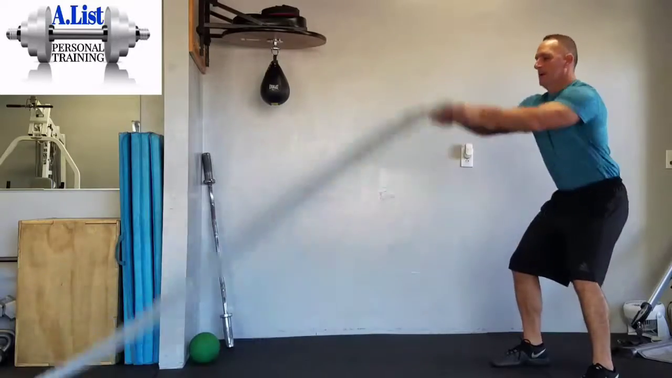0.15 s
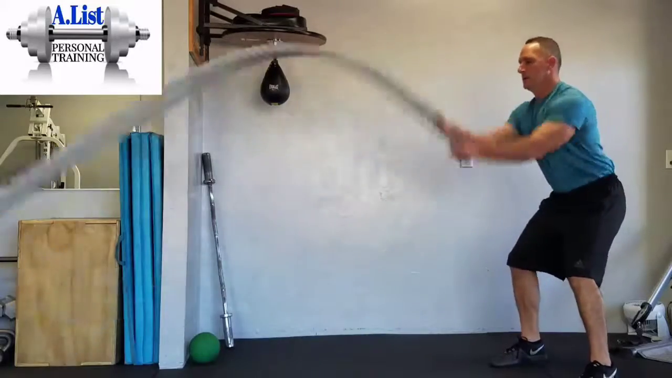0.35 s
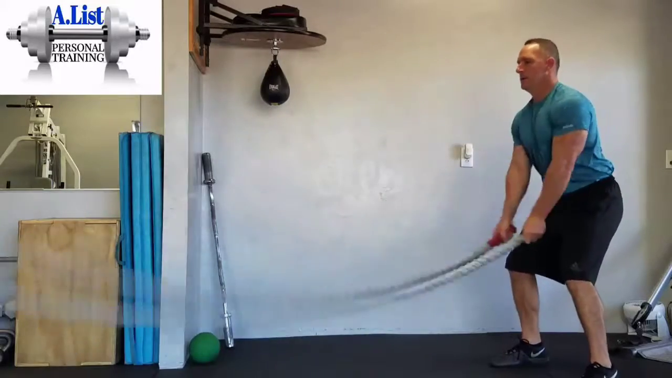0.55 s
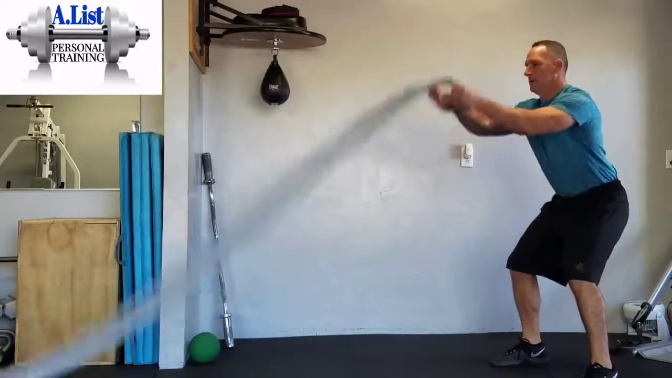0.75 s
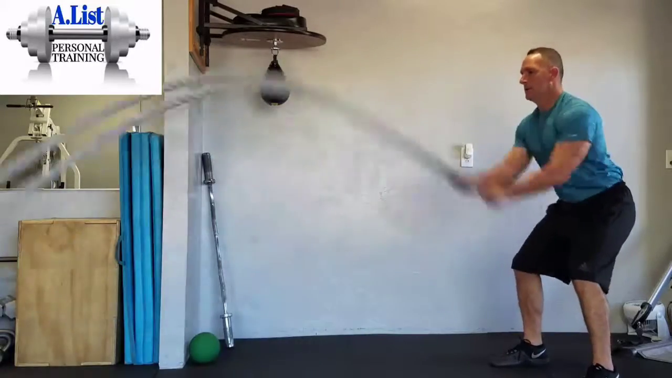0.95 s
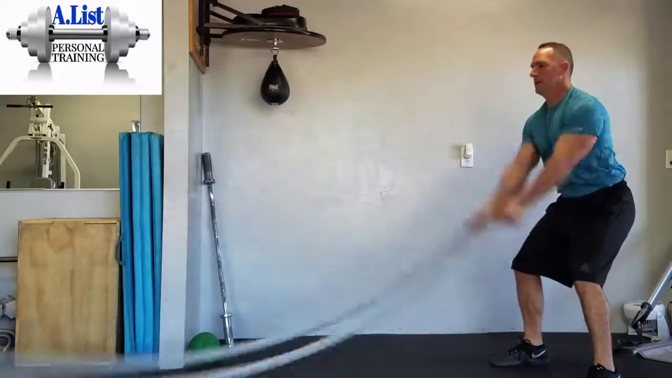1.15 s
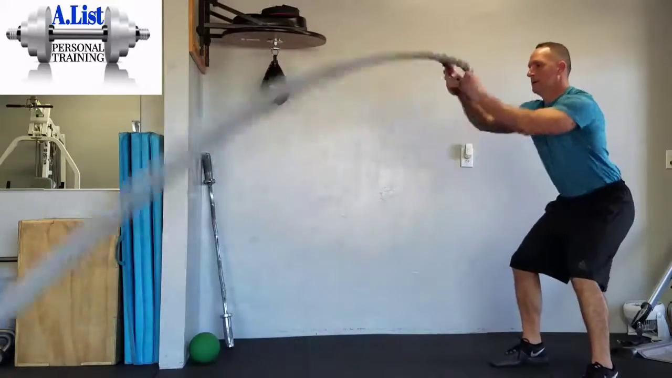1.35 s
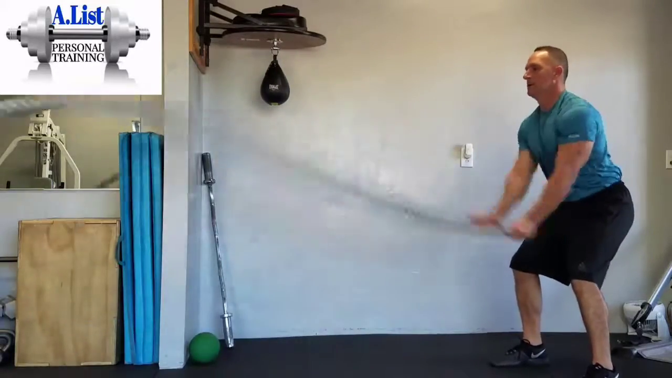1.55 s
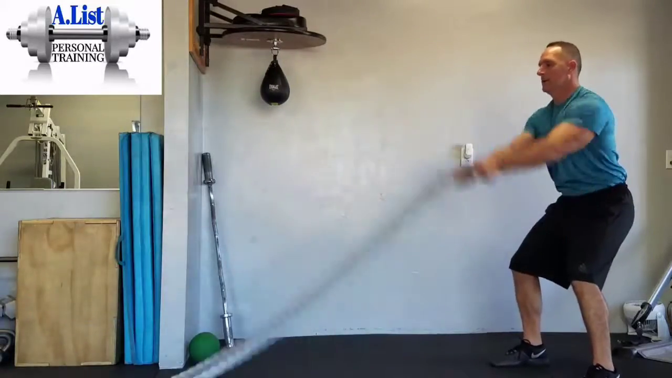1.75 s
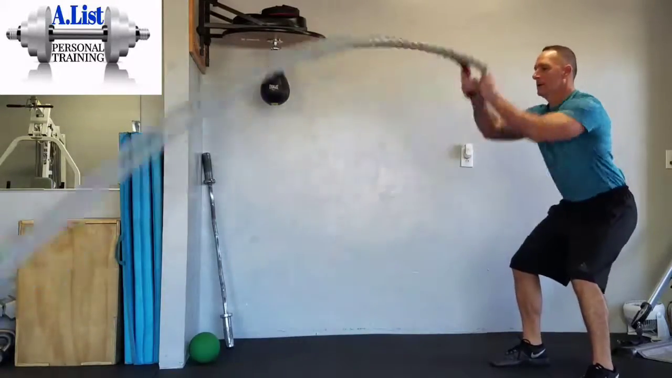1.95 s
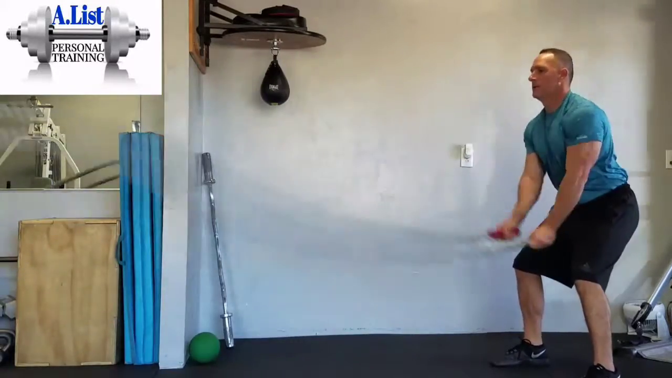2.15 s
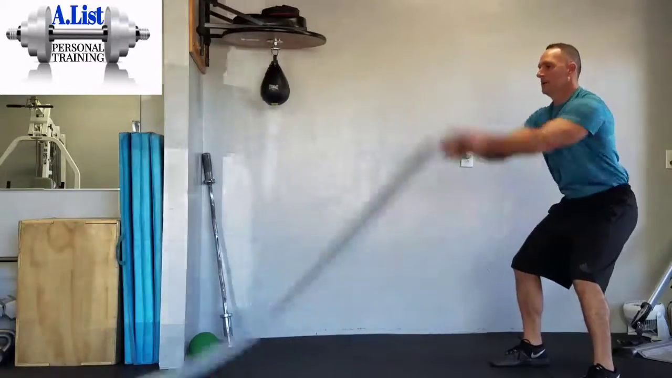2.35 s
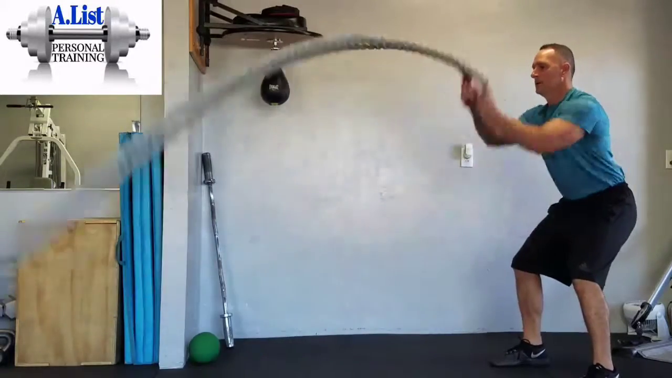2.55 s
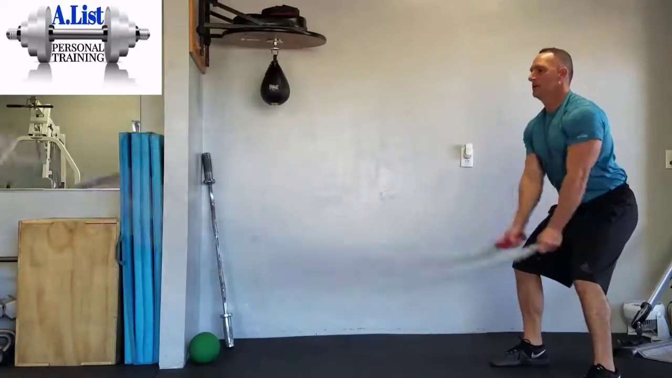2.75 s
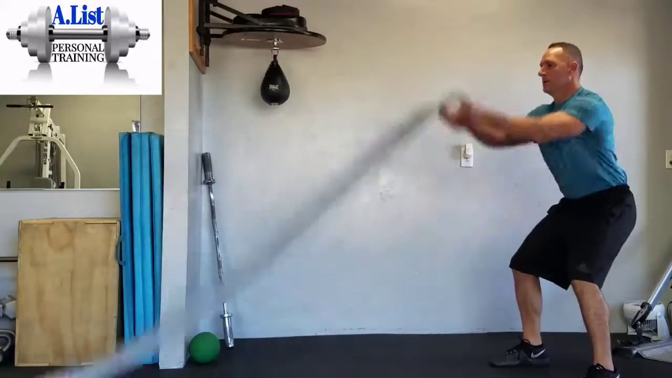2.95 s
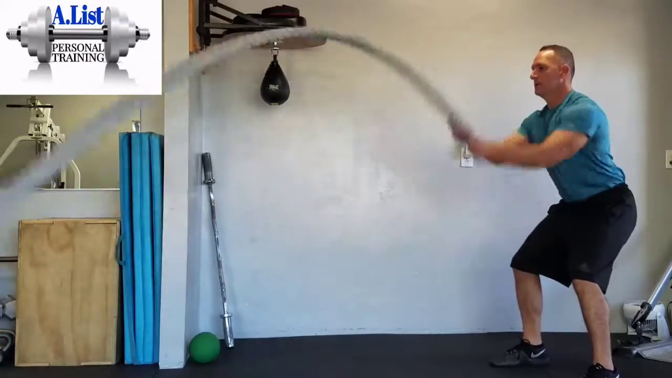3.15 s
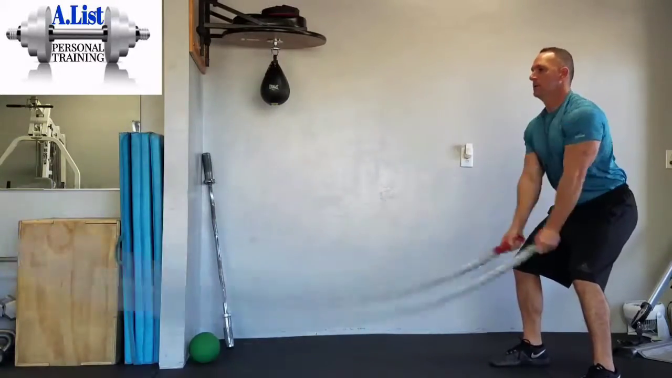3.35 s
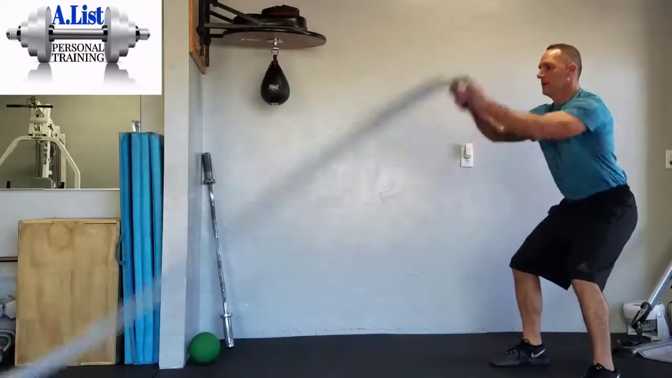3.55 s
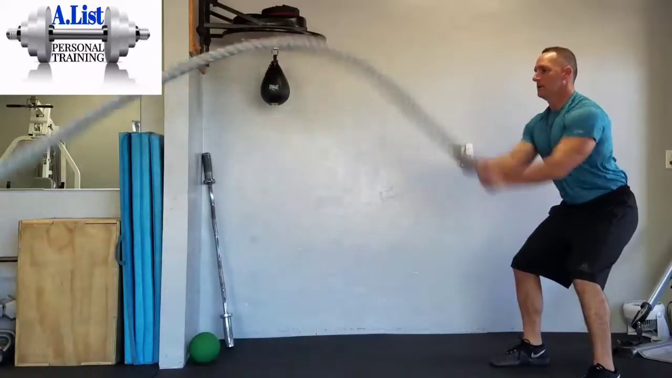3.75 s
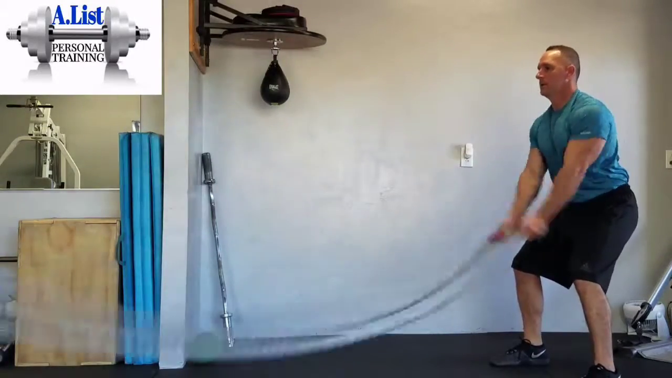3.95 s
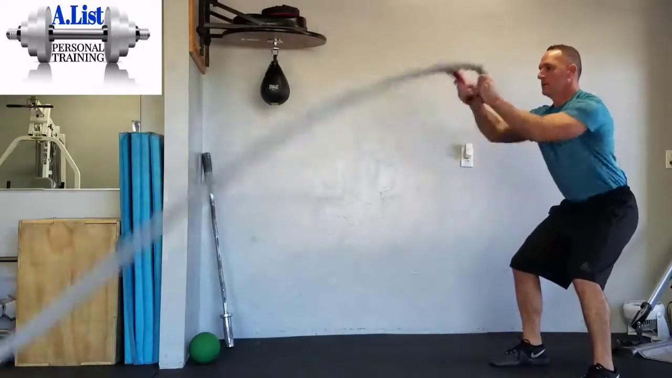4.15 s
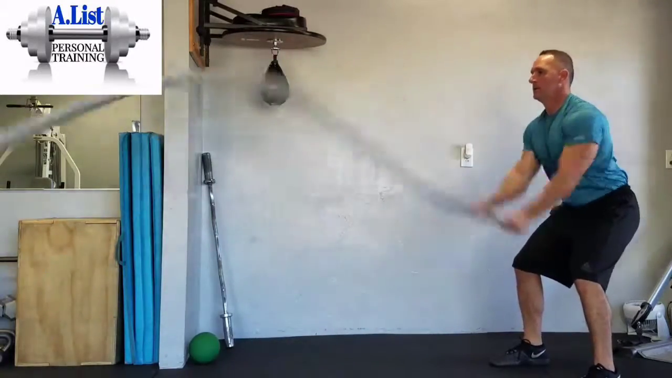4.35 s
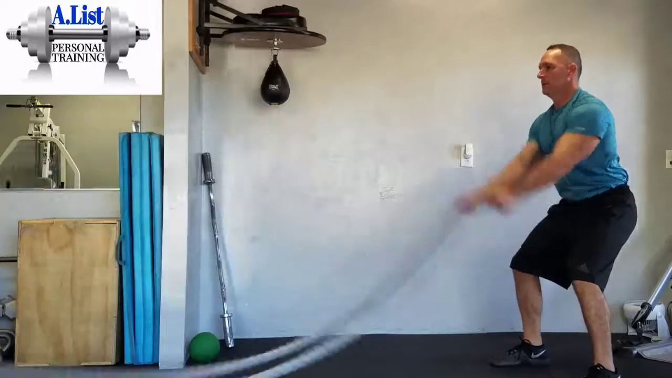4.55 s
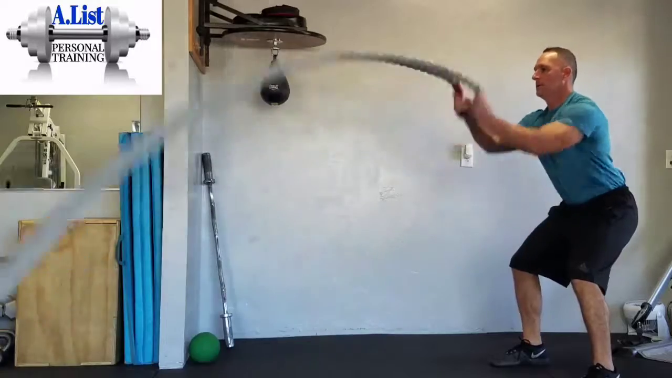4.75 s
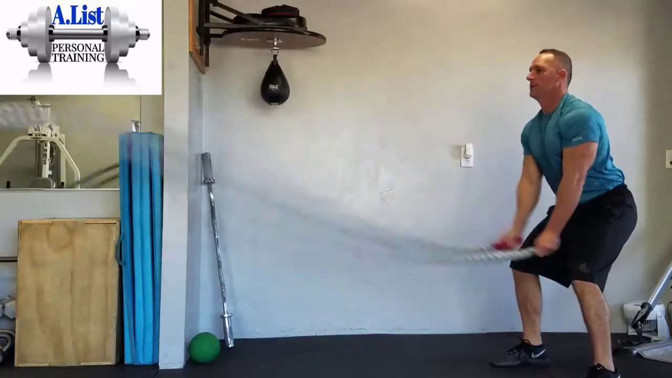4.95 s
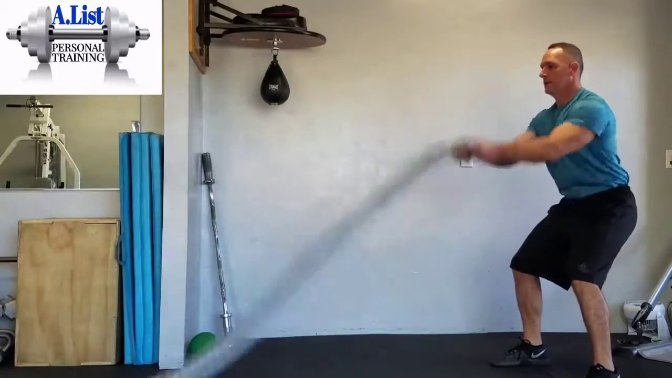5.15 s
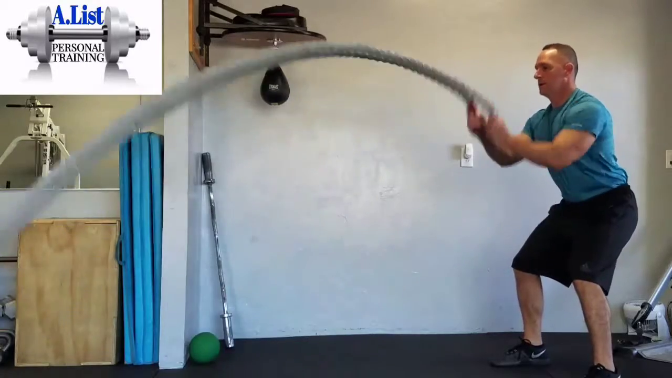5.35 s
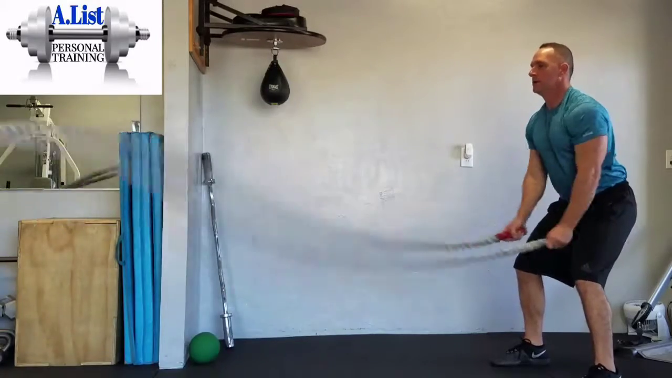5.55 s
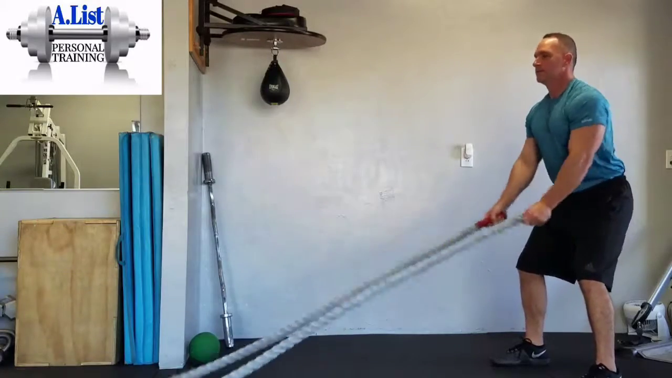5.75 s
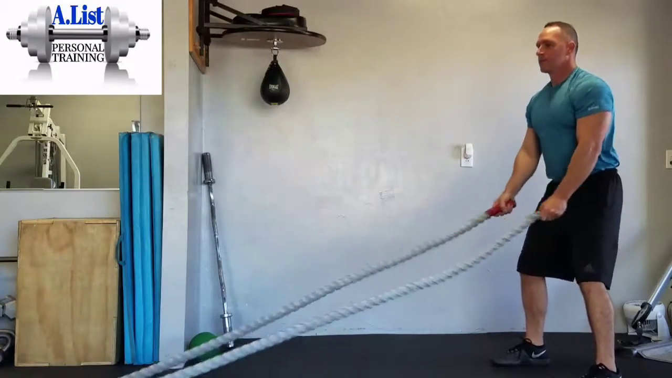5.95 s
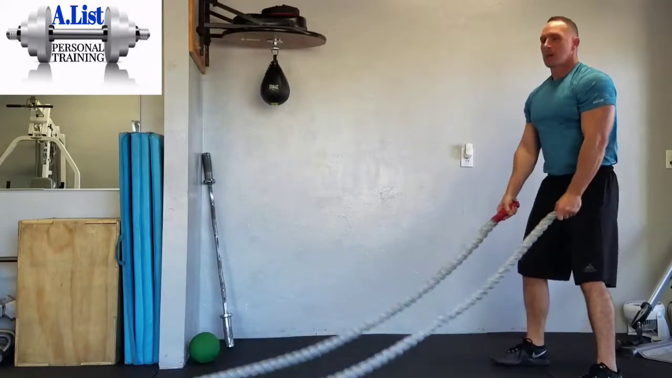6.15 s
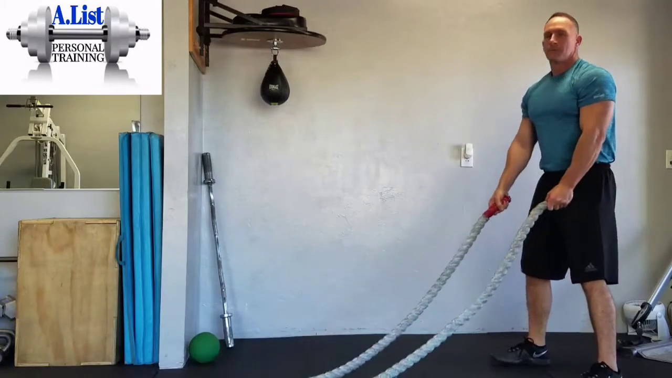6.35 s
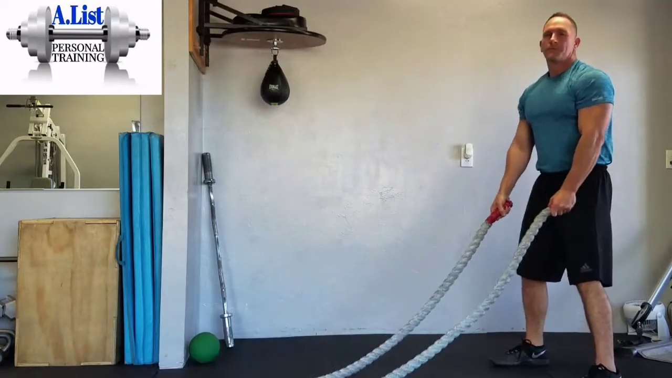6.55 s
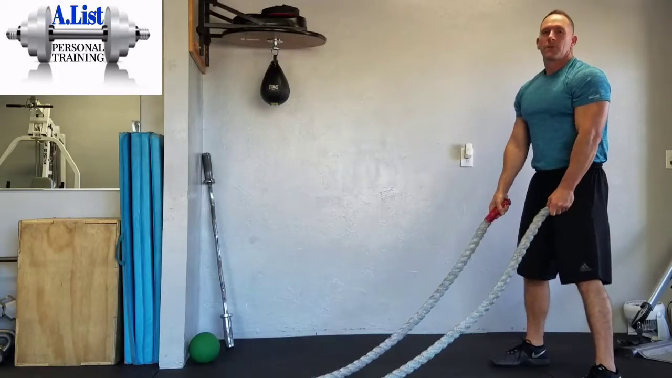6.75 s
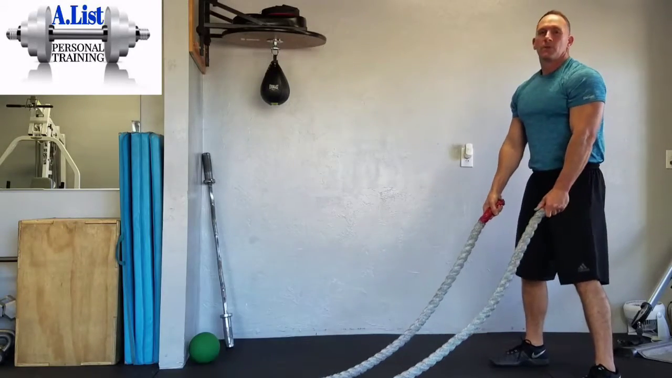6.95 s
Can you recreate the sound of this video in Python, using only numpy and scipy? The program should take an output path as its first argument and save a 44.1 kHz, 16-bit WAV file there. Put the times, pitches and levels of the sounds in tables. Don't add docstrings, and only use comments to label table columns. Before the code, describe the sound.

Heavy ropes slam a rubber gym floor about twice a second, each hard thud followed by a duller landing, overloading a close phone until they settle.

```python
import sys
import numpy as np
from scipy import signal
from scipy.fft import rfft, irfft
from scipy.io import wavfile
from scipy.ndimage import uniform_filter1d

SR = 44100
rng = np.random.default_rng(int(sys.argv[2]) if len(sys.argv) > 2 else 0)


def transcribe(u):
    v = np.clip(np.atleast_2d(u).T, -1, 1)
    q = np.round(v * 32767).astype(np.int16)
    wavfile.write(sys.argv[1], SR, q)


def magnitude_from_level(level_db):
    exponent = np.asarray(level_db, float) / 20
    return 10 ** exponent


N = 308700

SPAN = 32768
STEP = 32
LEAD_S = 0.0035


def rope():
    return near_slams() + far_landings()


# t/s, peak level/dB, roll time/s, hardness/dB
NEAR_SLAMS = [(0.2281, 5, 0.03, -9.5), (0.238, 4.5, 0.012, -14.5), (0.7457, 4.5, 0.026, -2.5),
              (1.2892, 4.5, 0.022, -5), (1.2938, -1.5, 0.016, -4.5), (1.8396, 6, 0.021, 3.5),
              (1.8447, -3.5, 0.013, -7), (2.3952, 3.5, 0.036, 2.5), (2.9744, 2.5, 0.036, 4),
              (3.5433, 3, 0.043, 3), (4.1122, 5, 0.019, 6), (4.6667, 1.5, 0.038, 4.5),
              (5.2285, 0.5, 0.029, -5.5), (5.2335, 1, 0.023, 10), (5.8162, 3, 0.051, 3),
              (5.84, -15, 0.024, -3)]


def near_slams():
    return contacts(NEAR_SLAMS, rate_hz=600, jitter=0.55, scatter_db=1.5, first_db=6.5, sign=-0.91,
                    blow_db=10.0, slab_db=16.5, slab_hz=203.4, fray_db=-30.5, soft_hz=5550.0, wet_db=4.5)


# t/s, peak level/dB, roll time/s, hardness/dB
FAR_LANDINGS = [(0.362, 2, 0.03, -6.5), (0.936, -4.5, 0.021, -10.5), (0.9697, -3, 0.039, -5.5),
                (1.475, -3.5, 0.065, -11.5), (1.509, -9.5, 0.05, 12.5), (2.0452, 0.5, 0.037, -6),
                (2.59, -10.5, 0.029, 2), (2.619, -1.5, 0.03, -11), (3.137, -8.5, 0.11, -13.5),
                (3.171, -4.5, 0.02, -7.5), (3.744, -2, 0.019, -10.5), (3.764, -1, 0.033, -0.5),
                (3.783, 1, 0.031, 0.5), (4.31, -7, 0.049, -9), (4.349, -6, 0.029, -5.5),
                (4.868, -4.5, 0.036, -10), (4.9108, 3, 0.017, -1.5), (4.929, -1, 0.02, -2.5),
                (5.401, -3, 0.05, -11.5), (5.459, 3, 0.009, -6), (5.473, -1, 0.018, -5.5),
                (5.9651, 3, 0.031, -6.5), (6.089, -9.5, 0.05, -16.5), (6.147, -39, 0.022, 13.5)]
# t/s, peak level/dB, roll time/s, hardness/dB
SLACK_TOUCHES = [(1.827, -57, 0.03, 10), (3.526, -54, 0.0089, 9), (4.095, -39, 0.019, 7),
                 (5.798, -41, 0.008, 9), (6.265, -15, 0.035, -15), (6.295, -24.5, 0.022, -9.5),
                 (6.361, -41, 0.025, -20), (6.386, -42, 0.014, -11), (6.576, -17, 0.0059, -17),
                 (3.95, -20, 0.0052, 3), (4.518, -30, 0.0039, 0), (5.085, -21, .006, 0)]


def far_landings():
    rows = [*FAR_LANDINGS, *SLACK_TOUCHES]
    return contacts(rows, rate_hz=520, jitter=0.61, scatter_db=1.5, first_db=4.5, sign=0.98,
                    blow_db=11.0, slab_db=19, slab_hz=150.4, fray_db=-39.5, soft_hz=2000.0, wet_db=0.5)


# f/Hz, level/dB
MAT_THUD = [(24, -53), (40, -49), (80, -24.5), (190, 11.5), (430, 13), (620, 11.5), (980, 7.5), (1400, 1),
            (1700, -51.5), (2100, -10.5), (3000, -42), (6600, -93.5)]
# f/Hz, level/dB
STRAND_CRACK = [(880, -39.5), (1500, 0), (1650, 0.5), (3750, -20), (4290, -20), (7720, -27.5), (8920, -35),
                (13900, -42.5), (15000, -59)]


def contacts(rows, rate_hz, jitter, scatter_db, first_db, sign, blow_db, slab_db, slab_hz, fray_db,
             soft_hz, wet_db, count=6):
    spot_s = 0.004
    fray_fade_s = 0.0023
    crack_per_hard = 0.4
    strands_right_db = 1.5
    balance = magnitude_from_level(np.array([[0.4], [-0.4]]))

    out = np.zeros((2, N))
    hz = np.arange(SPAN // 2 + 1) * SR / SPAN
    paths = [room(wet_db) for _ in range(count)]
    spot = (np.arange(SPAN // 2) / (spot_s * SR)).astype(int) % count
    mat = magnitude_from_level(blow_db) * rfft(response(MAT_THUD), SPAN)
    slab = magnitude_from_level(slab_db) / (1 + 1.6j * (hz / slab_hz - slab_hz / (hz + 1))) ** 2
    strand_gain = magnitude_from_level(fray_db + strands_right_db * np.array([[-1], [1]]))
    strands = strand_gain * rfft(response(STRAND_CRACK), SPAN)

    for k, (s, peak_db, roll_s, hard_db) in enumerate(rows):
        train = rolling(rate_hz, jitter, scatter_db, first_db, sign, roll_s)
        push = (1 + 1j * hz / (soft_hz * magnitude_from_level(hard_db))) ** -3
        fray_level = signal.lfilter([1], [1, -np.exp(-1 / (fray_fade_s * SR))], np.abs(train))
        fray = fray_level * rng.standard_normal((2, SPAN // 2))
        heard = 0
        for j, path in enumerate(paths):
            here = spot == (j - k) % count
            heard = heard + rfft(train * here, SPAN) * path
        thud = heard * (mat * push + slab)
        crack = magnitude_from_level(crack_per_hard * hard_db) * strands * rfft(fray, SPAN) * paths[k % count]
        add(out, s - LEAD_S, irfft(thud + crack) * magnitude_from_level(peak_db) * balance)
    return out


def rolling(rate_hz, jitter, scatter_db, first_db, sign, roll_s, count=100):
    lead_db, pause_s = -27, 0.003
    gap, strength, side = rng.standard_normal((3, count))
    t = np.cumsum(np.exp(jitter * gap)) / rate_hz
    t = t - t[0]
    strength[0] = first_db / scatter_db
    fade = np.exp(-(t / max(roll_s, 0.002)) ** 2)
    blow = magnitude_from_level(scatter_db * strength) * fade * np.where(side > 0.2, 1, -1)
    blow[0] = sign * abs(blow[0])
    t = t + LEAD_S + pause_s * (t > 0)
    train = np.zeros(SPAN // 2)
    np.add.at(train, np.minimum(t * SR, SPAN // 2 - 1).astype(int), blow)
    train[0] = -magnitude_from_level(lead_db) * blow[0]
    return train


# t/s, hold time/s, level/dB
SWISHES = [(.135, 0.038, -51), (.99, 0.0089, -59), (1.52, 0.0091, -65), (2.06, .01, -66), (2.318, .01, -71),
           (2.598, .01, -48.5), (2.842, 0.059, -64), (3.18, 0.0087, -49), (3.383, .01, -61),
           (3.76, 0.013, -43), (4.02, 0.092, -60), (4.336, .01, -52), (4.632, 0.014, -57.5),
           (4.898, .02, -44), (5.09, .02, -59), (5.45, 0.012, -48.5), (5.751, 0.08, -52), (6.1, 0.25, -58)]
# f/Hz, level/dB
SWISH_COLOUR = [(1500, -30.5), (2500, -1), (4500, -8), (6500, -12.5), (8500, -8), (9500, -23.5),
                (14000, -7.5), (15000, -28.5)]


def swish():
    rest_db, slam_db = -66.5, -44.5
    gain = magnitude_from_level(rest_db)
    for s, held_s, level_db in SWISHES:
        gain = gain + swell(s, held_s, level_db, rise_db_s=349, fall_db_s=169.5)
    for s, peak_db, *_ in NEAR_SLAMS:
        gain = gain + swell(s, 0, slam_db + peak_db, rise_db_s=1e5, fall_db_s=105.5)
    return colour(wide_noise(N), SWISH_COLOUR) * magnitude_from_level(-5.5) * np.repeat(gain, STEP)[:N]


def swell(s, held_s, level_db, rise_db_s, fall_db_s):
    age = np.arange(0, N, STEP) / SR - s
    below_db = np.maximum(-age * rise_db_s, (age - held_s) * fall_db_s)
    return magnitude_from_level(level_db - np.maximum(below_db, 0))


# t/s, peak level/dB, f/Hz
TICKS = [
    (6.8553, -39.5, 2000),
]


def tick():
    t60_s, rise_s = 0.04, 0.0015
    out = np.zeros((2, N))
    age = np.arange(SPAN // 32) / SR
    rough = rng.standard_normal((2, len(age)))
    rough = uniform_filter1d(uniform_filter1d(rough, size=20), size=20) * 6
    for s, peak_db, hz in TICKS:
        cycles = np.cumsum(hz * (0.88 + 0.25 * np.exp(-age / 0.006))) / SR
        scrape = (1.3 + rough[0]) * np.sin(2 * np.pi * cycles)
        high = (0.5 + rough[1]) * np.sin(2 * np.pi * 2900 * age) * np.exp(-age / 0.0023)
        fade = magnitude_from_level(peak_db - 2.5 - 60 * age / t60_s) * np.minimum(age / rise_s, 1)
        click = (scrape + high) * fade
        add(out, s, irfft(rfft(click, SPAN) * room(wet_db=2, lag=2)))
    return out


# f/Hz, time to fall 60 dB/s
ROOM_DECAY = [(60, 0.13), (160, 0.58), (420, 0.4), (1100, 0.45), (2900, 0.59), (7700, 0.38), (14000, 1)]


def room(wet_db, build_s=0.002, size=SPAN // 2, lag=12):
    t = np.arange(size) / SR
    noise = rfft(wide_noise(size))
    octave = np.log2(np.maximum(np.arange(size // 2 + 1) * SR / size, 1))
    tail = 0
    for centre in np.arange(5, 16):
        band = np.clip(1 - np.abs(octave - centre), 0, 1)
        tail = tail + irfft(noise * band) * magnitude_from_level(-60 * t / on_log(ROOM_DECAY, 2.0 ** centre))
    tail *= 1 - np.exp(-t / build_s)
    tail *= magnitude_from_level(wet_db) / np.sqrt(np.mean(np.sum(tail ** 2, axis=1)))
    tail[0, 0] = tail[1, lag] = 1
    return rfft(tail, SPAN)


# f/Hz, level/dB
AIR_COLOUR = [(15, -32.5), (25, -14), (125, -5.5), (158, -6.5), (176, -8.5), (427, -19.5), (709, -20.5),
              (856, -17.5), (1420, -20.5), (1540, -20.5), (2130, -24), (2500, -30.5), (4040, -45),
              (13800, -50.5), (15000, -41.5)]


def ventilation():
    level_db, open_db, settle_s = -47.5, 10, 0.72
    flicker_db, flicker_s = 1.5, 0.1
    hum_db, hum_hz = -58, 121
    t = np.arange(N) / SR
    gain_db = level_db + open_db * np.exp(-t / settle_s) + flicker_db * drift(flicker_s)
    rumble = colour(wide_noise(N), AIR_COLOUR) * magnitude_from_level(gain_db)
    hum = magnitude_from_level(hum_db) * np.sin(2 * np.pi * hum_hz * t)
    return rumble + hum


def drift(held_s):
    size = int(held_s * SR)
    walk = uniform_filter1d(uniform_filter1d(rng.standard_normal(N), size=size), size=size)
    return walk / walk.std()


# f/Hz, correlation (0 to 1)
LIKENESS = [(60, 0.95), (200, 0.87), (400, 0.59), (800, 0), (1500, 0), (8000, 0)]


def wide_noise(size):
    like = np.clip(on_log(LIKENESS, np.arange(size // 2 + 1) * SR / size), -1, 1)
    mid, side = rfft(rng.standard_normal((2, size)))
    mid = mid * np.sqrt((1 + like) / 2)
    side = side * np.sqrt((1 - like) / 2)
    return irfft(np.array([mid + side, mid - side]), size)


def on_log(table, hz):
    f, v = np.transpose(table)
    return np.interp(np.log(np.maximum(hz, 1)), np.log(f), v)


def response(table, size=4096):
    gain = magnitude_from_level(on_log(table, np.arange(size // 2 + 1) * SR / size))
    cepstrum = irfft(np.log(gain))
    cepstrum[1:size // 2] *= 2
    cepstrum[size // 2 + 1:] = 0
    shape = irfft(np.exp(rfft(cepstrum)))[:size // 2]
    return shape / np.linalg.norm(shape)


def colour(x, table):
    return signal.fftconvolve(x, response(table)[None], axes=1)[:, :x.shape[1]]


def add(out, s, x):
    at = int(s * SR)
    out[:, at:at + SPAN] += x[:, :N - at]


def scene():
    return rope() + swish() + tick() + ventilation()


def band_limit(x):
    return signal.sosfilt(signal.butter(12, 15840, fs=SR, output="sos"), x)


def record(dry):
    knee = 5.0
    mix = 1.01 * dry / (1 + np.abs(dry) ** knee) ** (1 / knee)
    return band_limit(mix)


dry = scene()
out = record(dry)
transcribe(out)
```